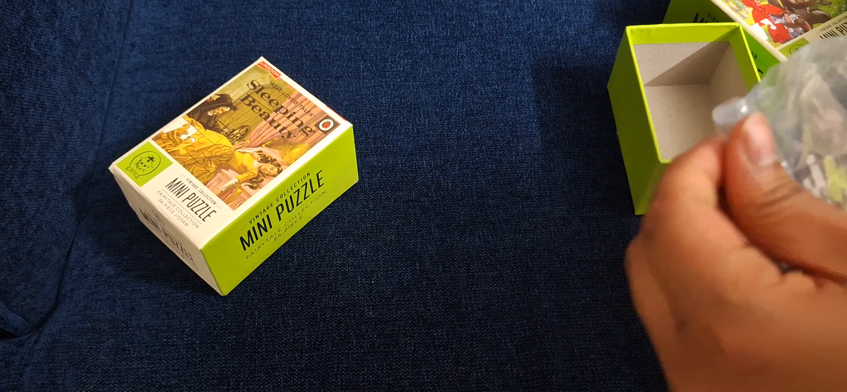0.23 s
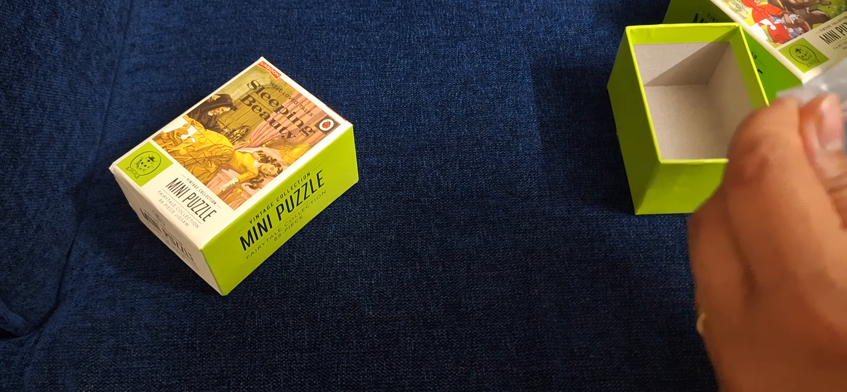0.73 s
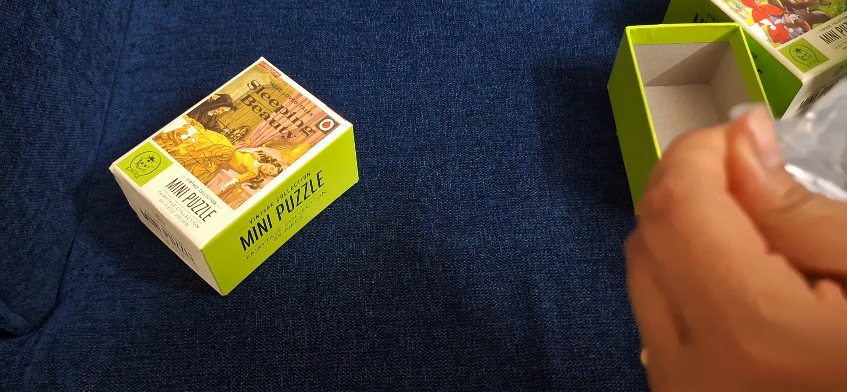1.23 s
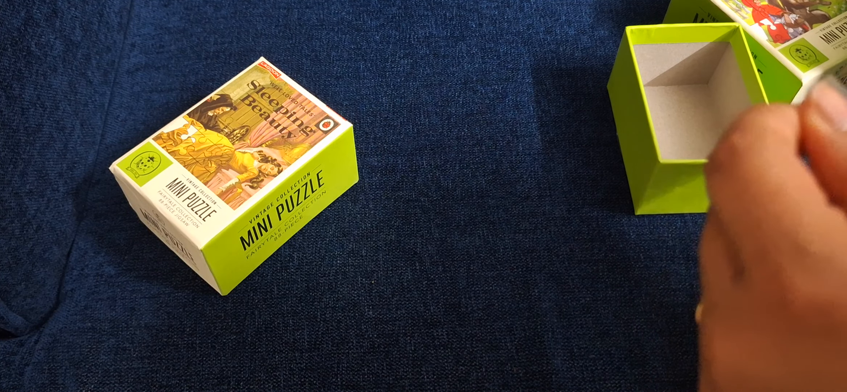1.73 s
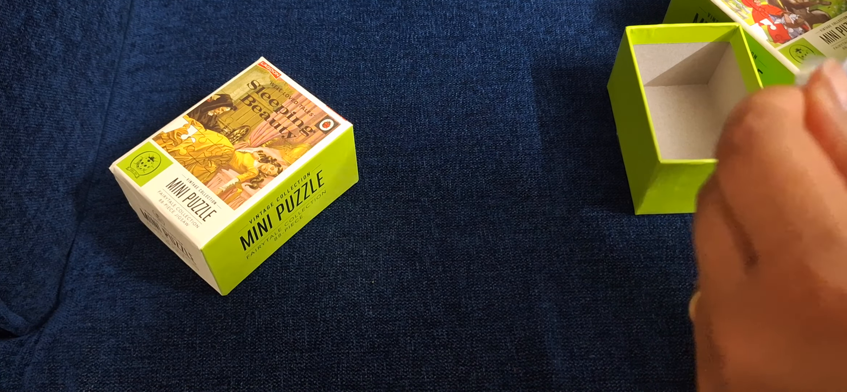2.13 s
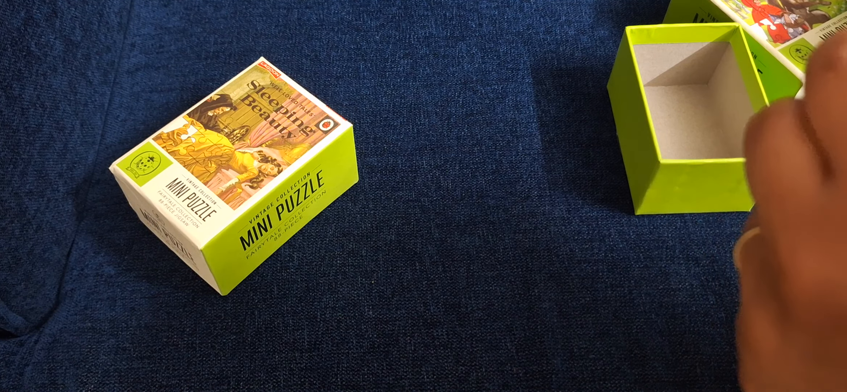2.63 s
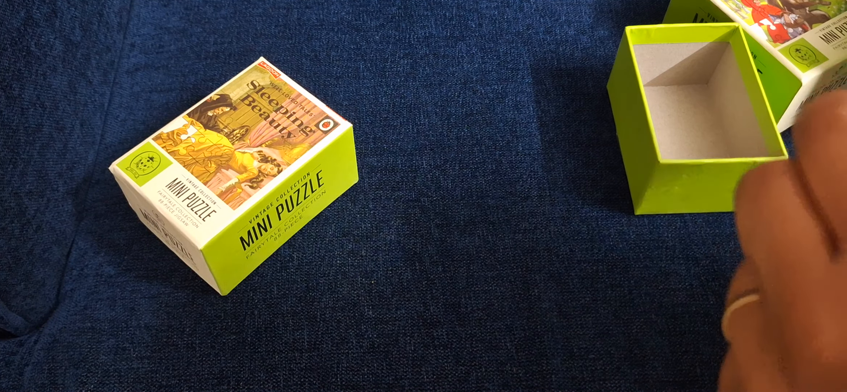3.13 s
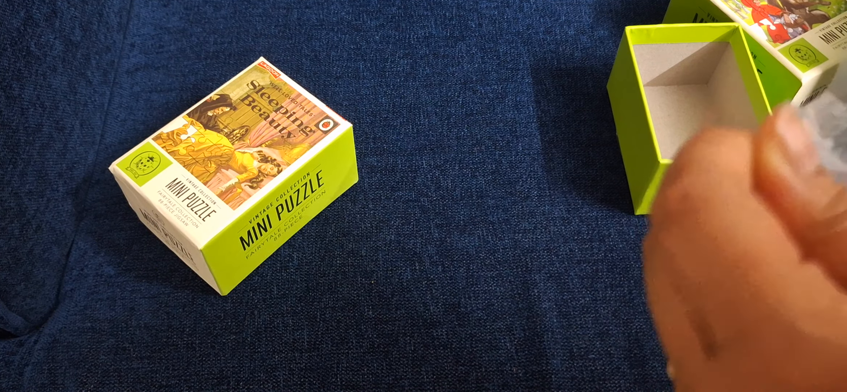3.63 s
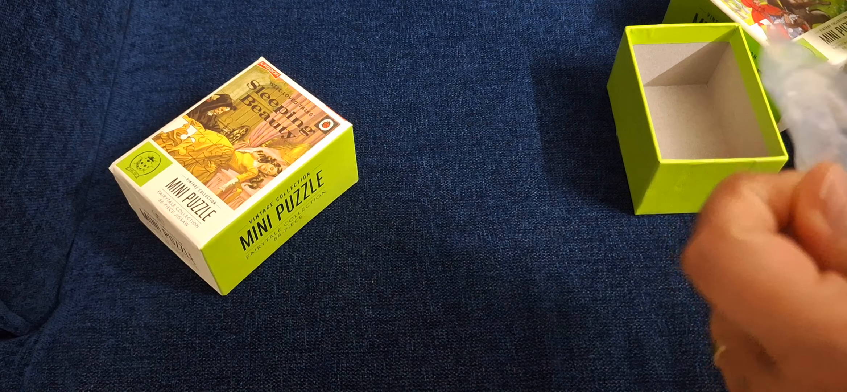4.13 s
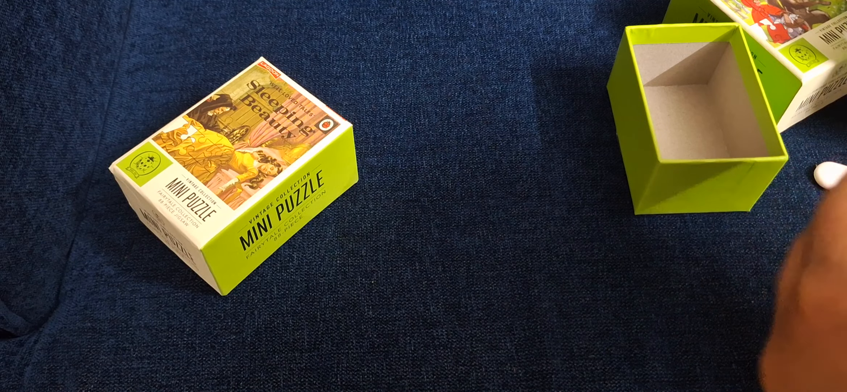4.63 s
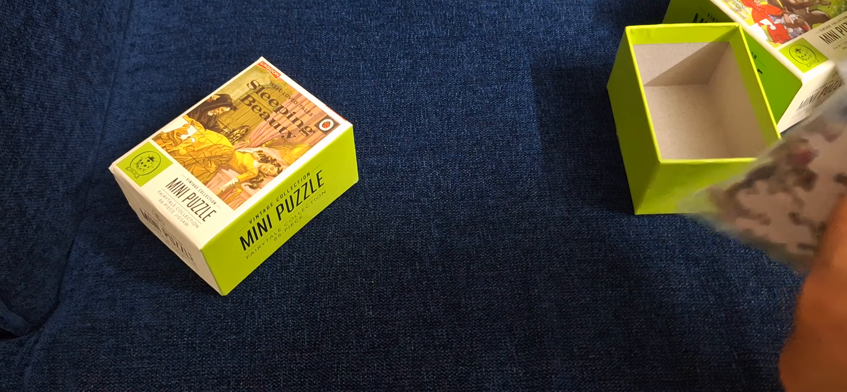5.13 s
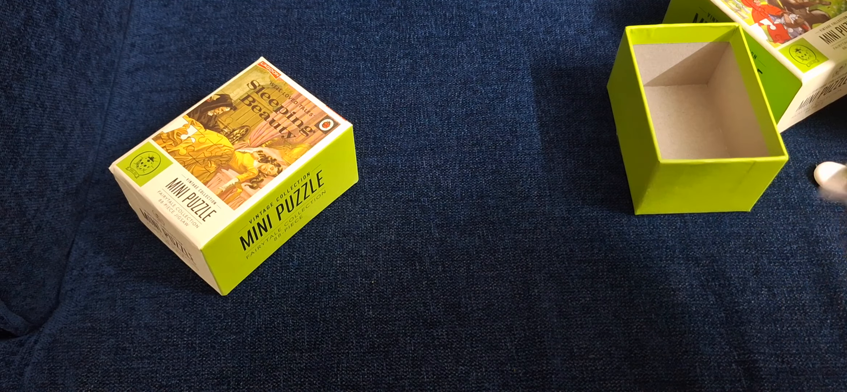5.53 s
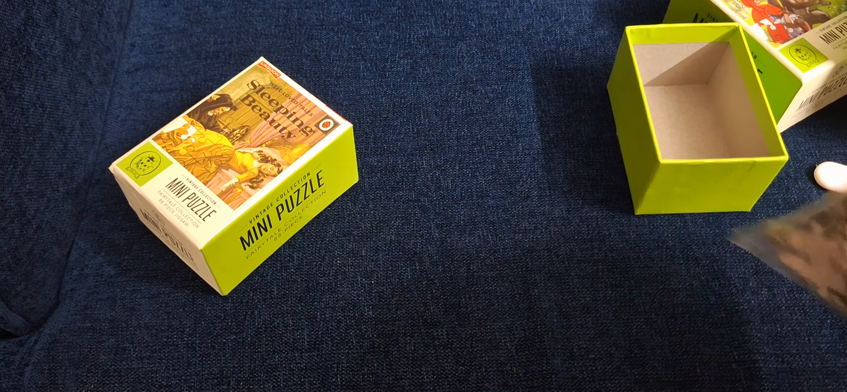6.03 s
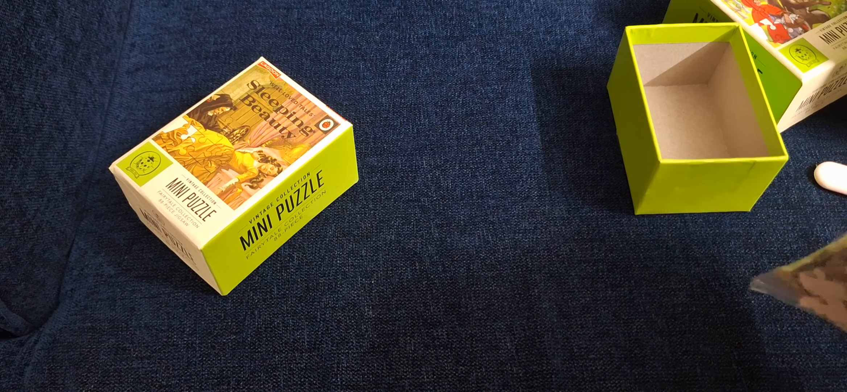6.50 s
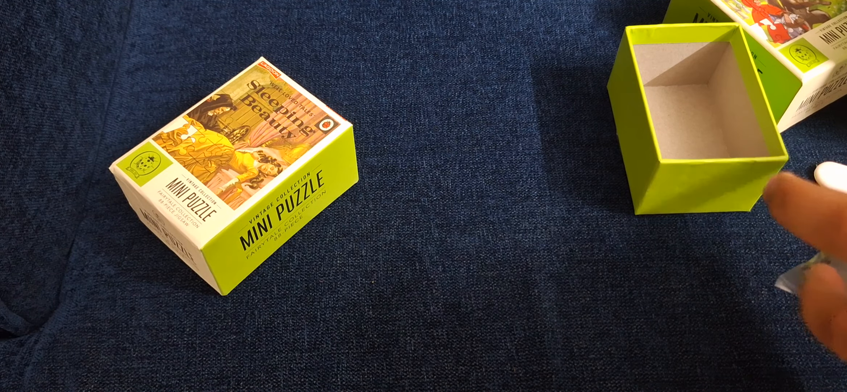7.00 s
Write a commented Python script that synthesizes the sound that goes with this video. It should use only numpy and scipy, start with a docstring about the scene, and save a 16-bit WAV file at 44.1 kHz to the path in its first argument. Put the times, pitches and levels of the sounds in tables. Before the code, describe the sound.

Close to the microphone and mostly on the right, hands work open a small plastic bag of cardboard puzzle pieces. A few light crackles build into sharp crinkling, and the seal peels with a brief rasp. Irregular squeezes and tugs follow, with crisp snaps, rubbing plastic, soft bumps and pieces shuffling and clicking inside. A faint low hum lies under it all in a quiet furnished room.

```python
"""Opening a bag of puzzle pieces

Hands pull open a small plastic bag of cardboard pieces, close to the right of a phone in a furnished
room. Each squeeze crinkles the film and shuffles the pieces, and large creases buckle with sharp snaps.
Friction makes fingertips hiss and pressed film rasp and creak; the seal peels in one burst of slips.
The bag bumps softly, and a mains hum lies under it all."""
import sys
import numpy as np
from scipy import signal
from scipy.fft import rfft, irfft
from scipy.io import wavfile
from scipy.ndimage import map_coordinates

SR = 44100
rng = np.random.default_rng(int(sys.argv[2]) if len(sys.argv) > 2 else 0)


def put_to_file(sound):
    """Save the sound as 16-bit audio at rate SR, in the file named by the first command-line argument."""
    columns = np.atleast_2d(sound).T  # one column per channel
    safe = np.clip(columns, -1, 1)
    whole_steps = np.round(safe * 32767)
    wavfile.write(sys.argv[1], SR, whole_steps.astype(np.int16))


N = 320166
TIME = np.arange(N) / SR

# Spectra of the steady background: f/Hz, level/dB
APPLIANCE_SPECTRUM = [(20, -45.5), (40, -23), (55, -6), (65, 7), (80, -4), (110, -6), (150, -16.5),
                      (300, -55)]
AIR_SPECTRUM = [(100, -21.5), (200, -17.5), (400, -20.5), (900, -32), (3600, -46.5), (7600, -43),
                (16000, -50)]
# Squeezes and tugs: t/s, hold/s, relative film level/dB, level of the pieces/dB
SQUEEZES = [(0.038, 0.15, -64, -58.5), (0.26, 0.23, -66.5, -69), (0.679, 0.09, -47, -61),
            (0.991, 0.23, -37, -52.5), (1.33, 0.22, -44.5, -57.5), (1.778, 0.0072, -47, -49),
            (1.851, 0.049, -48.5, -48), (2.047, 0.0082, -66, -50.5), (2.15, 0.0084, -52.5, -57),
            (2.431, 0.012, -55, -54.5), (2.56, 0.028, -42, -51.5), (2.828, 0.048, -48.5, -58),
            (2.998, 0.034, -47.5, -62), (3.138, 0.013, -35, -51.5), (3.239, 0.093, -35, -51.5),
            (4.124, 0.067, -44, -50), (4.27, 0.16, -57.5, -66), (4.433, 0.045, -42, -47),
            (4.56, 0.017, -42.5, -51.5), (4.68, .19, -43.5, -57), (5.048, 0.24, -48, -55.5),
            (5.432, 0.075, -51, -45), (5.619, 0.41, -47, -57.5), (5.949, 0.25, -62.5, -57),
            (6.26, 0.013, -39.5, -54.5), (6.363, 0.031, -33, -54), (6.48, 0.097, -56, -69),
            (6.619, 0.26, -48.5, -61), (7.165, 0.026, -42.5, -57)]
# Spectra of crinkling film, shuffling pieces and a buckling crease: f/Hz, level/dB
CRINKLE_SPECTRUM = [(300, -24.5), (900, 1), (2000, 12.5), (2900, 8.5), (5000, 3), (7500, -0.5),
                    (9000, -7.5), (16000, -9)]
SHUFFLE_SPECTRUM = [(70, -15.5), (180, 3.5), (420, 1), (700, -6.5), (1400, -3), (2400, -16.5), (5000, -21)]
SNAP_SPECTRUM = [(100, -25), (240, -11), (420, -0.5), (1000, -3.5), (2100, 2.5), (2900, -1), (5200, -2.5),
                 (6400, -3), (7600, 3), (9000, -6), (16000, -3)]
# Large creases buckling: t/s, relative energy/dB, facet resonance f/Hz, body of bag and pieces/dB
SNAPS = [(0.0323, -29.5, 8050, -5), (0.058, -33.5, 6300, -4), (0.166, -28.5, 5250, -30),
         (0.2151, -22, 8450, -69), (0.4293, -24.5, 4820, -9), (0.677, -25, 6230, -2),
         (0.6919, -10, 2750, -7), (0.6991, -10.5, 6500, 10.5), (0.7122, -17.5, 4700, 12),
         (0.752, -5.5, 5030, 0), (0.814, -10, 6300, -24), (0.869, -11, 6800, 5), (0.958, -12.5, 4830, 1),
         (0.987, -11.5, 4970, 13.5), (0.9937, -10, 3180, -6), (1.0222, -9.5, 5000, 10),
         (1.031, -12, 4730, -3), (1.0475, -9, 4900, 14), (1.0649, -4, 5530, -1), (1.0918, -5.5, 3180, -7),
         (1.097, -8.5, 4550, 8), (1.1248, -12, 6130, -6), (1.159, -4.5, 5070, 10), (1.208, -18, 3370, -20),
         (1.3223, -18, 2240, 5), (1.3785, -18.5, 1910, 2), (1.5853, -21, 4890, 13),
         (1.7317, -32.5, 3480, 3.5), (1.7933, -20, 6000, -17), (1.8, -22.5, 5100, -1),
         (1.839, -11, 4450, 3), (1.845, -17.5, 4200, -5), (1.859, -11, 4800, -2.5), (1.8776, -11, 7850, 11),
         (1.897, -0.5, 5230, -54), (2.141, -28, 4860, -21), (2.328, -35, 1970, 6), (2.439, -22, 3300, 3),
         (2.4769, -23.5, 4750, -5), (2.55, -19.5, 4480, -3), (2.557, -18, 4200, 5),
         (2.5732, -15, 1480, 0.5), (2.5856, -2.5, 10200, 4.5), (2.5964, -8.5, 3350, -31),
         (2.6606, -14.5, 2360, -8), (2.8053, -20.5, 4600, -10), (2.8376, -15.5, 2830, -9),
         (2.8425, -20, 2290, -1), (3.012, -24.5, 3020, 14), (3.023, -29, 2110, 16), (3.0817, -19, 4250, -2),
         (3.113, -24.5, 2900, -10), (3.1314, -6, 3480, 0), (3.1412, -1.5, 6100, -3),
         (3.1486, -5.5, 2570, -8), (3.185, -2, 5900, 3.5), (3.197, -5.5, 1880, -3),
         (3.2373, -0.5, 1960, 6.5), (3.2425, -13, 3200, 13), (3.2601, -5, 2435, 10.5),
         (3.2643, -7.5, 1297, 11.5), (3.2944, -1.5, 2140, 14.5), (3.37, -21.5, 2000, 14),
         (3.603, -34, 785, 4.5), (4.044, -30.5, 4300, 3.5), (4.1274, -17.5, 840, 17),
         (4.1494, -13, 3700, -25), (4.2243, -18.5, 6700, -27), (4.411, -21.5, 4100, -11),
         (4.419, -16.5, 7360, -17), (4.4448, -20.5, 1890, -6), (4.4545, -10, 4100, -16),
         (4.457, -11.5, 6500, -17), (4.475, -18, 2000, -10), (4.494, -18, 4870, 12.5),
         (4.5254, -16.5, 4300, -25), (4.561, -13.5, 3020, -0.5), (4.5946, -10.5, 3220, -12),
         (4.598, -14, 6860, -12), (4.6326, -13.5, 7800, 11.5), (4.661, -18.5, 4630, 0),
         (4.6887, -13, 2960, -3), (4.7085, -22, 3800, 4),(4.7345, -23.5, 6800, -17), (4.8026, -18, 6100, 6),
         (4.8201, -9.5, 2100, -11), (4.963, -24.5, 1410, 5), (4.9853, -13, 8900, -9),
         (5.0409, -14, 5130, 6), (5.0557, -12, 1980, 1), (5.0692, -7.5, 6900, -5), (5.1003, -3, 7350, -11),
         (5.12, -13.5, 5870, -30), (5.144, -15, 4100, -15), (5.153, -14.5, 5560, -19),
         (5.221, -20, 4520, -19), (5.2425, -29, 3500, 1), (5.2566, -18, 5270, -15),
         (5.2608, -10, 5400, -30), (5.3033, -16.5, 3040, -14), (5.337, -24, 4100, 3),
         (5.395, -17.5, 6840, -12), (5.4125, -16, 4560, -19), (5.423, -8.5, 2020, -14),
         (5.4317, -7, 8600, -3), (5.4455, -7.5, 5300, -3), (5.4661, -9, 7000, -10), (5.4737, -6.5, 5100, 6),
         (5.4778, -8, 4260, 12.5), (5.489, -12.5, 5000, -15), (5.5296, -11, 6160, -3),
         (5.5439, -15, 3500, 7), (5.588, -18, 7140, -23), (5.5932, -16.5, 2210, -3), (5.651, -10, 8450, -2),
         (5.676, -12, 7800, -8), (5.743, -22.5, 2540, -4), (5.7715, -17.5, 1560, -1.5),
         (5.8082, -17, 1910, 7), (5.8235, -16, 1900, 7), (5.9416, -15, 2460, 8), (5.9635, -20.5, 2600, 7),
         (6.0032, -20, 1620, 12), (6.023, -29, 3540, -11), (6.0525, -14, 1720, 1.5), (6.152, -13, 1910, -5),
         (6.2311, -14, 2200, -1.5), (6.367, -18, 1930, 1), (6.3762, -17.5, 1900, 4),
         (6.455, -19.5, 2300, -5), (6.5834, -21.5, 3350, -8), (6.6134, -11, 3100, -19),
         (6.66, -16.5, 1810, 11), (6.805, -23, 1720, 5.5), (6.832, -25, 1810, 3.5), (7.155, -12, 2580, -10)]
# Pieces colliding, low when flat, high when edge to edge: t/s, energy/dB, f/Hz
CLACKS = [(0.041, -26, 323), (0.669, -24.5, 1570), (0.828, -21.5, 363), (1.037, -11.5, 563),
          (1.11, -13, 920), (1.192, -14.5, 420), (1.216, -15.5, 1600), (1.245, -29, 480), (1.263, -16, 394),
          (1.399, -15, 1190), (1.856, -14.5, 513), (1.908, -17, 1470), (2.075, -32, 416),
          (2.428, -27.5, 317), (2.531, -30, 1200), (2.614, -14, 460), (2.676, -24.5, 446),
          (2.947, -32.5, 1470), (2.963, -38, 2200), (3.035, -30, 790), (3.3722, -11.5, 1440),
          (4.311, -29.5, 1480), (4.738, -24.5, 580), (5.741, -17, 1360), (5.824, -16, 396),
          (6.092, -24, 1200), (6.122, -25.5, 750), (6.171, -22.5, 990), (6.266, -27, 746),
          (6.313, -25, 1100), (6.33, -20.5, 1100), (6.344, -16.5, 850)]
# Fingertips sliding on smooth film: t/s, hold/s, level/dB
SLIDES = [(0.08, 0.0043, -54.5), (0.112, 0.091, -66), (2.041, 0.03, -55.5), (2.385, 0.017, -58.5)]
# Film dragged over film and pieces: t/s, hold/s, level/dB, left minus right/dB
DRAGS = [(1.03, 0.11, -49.5, 0), (1.768, 0.034, -55, -4), (3.197, 0.11, -36, -3), (4.438, .04, -43, -5),
         (5.049, 0.018, -40, -8), (5.43, 0.062, -39.5, -1.5), (5.95, 0.25, -57.5, 1),
         (6.376, 0.026, -46.5, 4)]
# Spectra of the slips in sliding, dragging and peeling: f/Hz, level/dB
SLIDE_SPECTRUM = [(1000, -14.5), (5000, 0), (7500, -2), (16000, -2)]
DRAG_SPECTRUM = [(230, -27), (500, -3), (1100, -3.5), (1900, 2), (3600, 0), (5200, -0.5), (7800, -5),
                 (9000, -10.5), (16000, -5)]
SEAL_SPECTRUM = [(70, 2), (200, 15), (450, 11.5), (900, -11.5), (2000, 2.5), (3000, 1.5), (5500, 2),
                 (6800, -5), (7600, 2.5), (9000, -6.5), (16000, -4.5)]
# Soft bumps of hand and bag: t/s, level/dB, f/Hz
BUMPS = [(1.47, -44, 174), (1.497, -39, 71), (2.047, -37.5, 207), (3.185, -36.5, 51.1), (3.241, -34, 72.7),
         (4.151, -39.5, 144), (4.169, -40, 72), (5.43, -43, 99), (5.824, -35, 213), (5.962, -45.5, 101),
         (6.602, -41.5, 79.2), (7.175, -37, 96.5)]
# Single slips of taut film: t/s, energy/dB
CREAKS = [(3.711, -17.5), (3.7385, -31), (3.78, -36), (3.807, -34), (3.8408, -37.5)]
# Resonances of taut film: f/Hz, half-width/octaves, peak/dB
TAUT_FILM_MODES = [(4000, 0.19, 17.5), (7650, 0.12, 19), (13000, 0.45, 8.5)]
# Direction of the bag: t/s, left minus right/dB
BAG_PAN = [(0, -6.5), (1.1, -5), (1.9, -10.5), (2.55, -8), (2.8, -3), (3.14, -5), (3.29, -13.5),
           (3.37, -0.5), (3.7, -11), (4.2, -4), (5.1, -7), (5.5, -2.5), (6.0, -2), (6.4, -3), (6.8, 5),
           (7.2, 4.5)]
# Response of the left microphone port, which faces away and loses treble: f/Hz, gain/dB
FAR_PORT_RESPONSE = [(70, 0.5), (250, 2), (1000, 2), (7200, 1.5), (8700, -3.5), (16000, -7)]

FORERUN_S = .0035  # longest lead of a crease's small first flip over its main one


def undb(db):
    """A level of 20 dB is a factor of ten in amplitude."""
    return 10 ** (np.asarray(db) / 20)


def unit(x):
    """Normalisation to an rms of 1."""
    return x / np.sqrt(np.mean(x ** 2))


def bins(size):
    """Frequencies of the discrete Fourier transform, held at 1 Hz or above."""
    return np.maximum(np.arange(size // 2 + 1) * SR / size, 1)


def shape_db(points, size):
    """Interpolation of a spectrum along logarithmic frequency."""
    hz, db = np.transpose(points)
    return np.interp(np.log(bins(size)), np.log(hz), db)


def causal(db):
    """Minimum-phase response for a gain curve: a sharp onset, with the ringing after it."""
    cepstrum = irfft(np.log(undb(db)))
    half = len(cepstrum) // 2
    cepstrum[1:half] *= 2
    cepstrum[half + 1:] = 0
    return np.exp(rfft(cepstrum))


def colour(x, spectrum, size=8192):
    """Convolution imposes a spectrum on both channels."""
    return signal.fftconvolve(x, irfft(causal(shape_db(spectrum, size)))[None], axes=1)[:, :N]


def resonance(centre_hz, octaves, size):
    """A resonance curve: 1 at its centre, one half at the given distance to either side."""
    return 1 / (1 + (np.log2(bins(size) / centre_hz) / octaves) ** 2)


def noise_pair(apart, size):
    """Partial coherence: two noises share a common part."""
    common, left, right = rng.standard_normal((3, size))
    return (common + apart * np.array([left, right])) / np.hypot(1, apart)


def wander(per_s):
    """Random modulation: Gaussian values joined by straight lines."""
    return np.interp(TIME * per_s, np.arange(4096), rng.standard_normal(4096))


def grains(per_s, spread_db, apart):
    """Shot noise: impulses at random times, a few much larger than the rest."""
    strength = undb(spread_db * np.minimum(rng.exponential(size=N), 3))
    return unit((rng.random(N) < per_s / SR) * strength * noise_pair(apart, N))


def effort(s, hold_s, rise_db_per_s=887, fall_db_per_s=392.5):
    """Envelope of a hand movement: exponential growth to 1 at time s, a hold, exponential decay."""
    before, after = np.maximum(s - TIME, 0), np.maximum(TIME - s - hold_s, 0)
    return undb(-np.minimum(rise_db_per_s * before + fall_db_per_s * after, 120))


def background(hum_hz=100, hum_db=-61, rumble_db=-61, air_db=-68.5):
    """Superposition of a mains tone, the rumble of an appliance and faint room air."""
    phase = 2 * np.pi * hum_hz * TIME + 0.18 * wander(0.55)
    hum = np.sqrt(2) * np.sin(phase) * undb(0.27 * wander(3.2))
    rumble = unit(colour(noise_pair(.65, N), APPLIANCE_SPECTRUM))
    air = unit(colour(noise_pair(0.89, N), AIR_SPECTRUM))
    return undb(hum_db) * hum + undb(rumble_db) * rumble + undb(air_db) * air


def contacts(low_hz, high_hz, per_s, spread_db, flutter_s, ring_db, count=8, size=512):
    """Impulse excitation: tiny contacts of several sizes, each size with its own flutter and ring."""
    out, fade = 0, np.exp(-np.arange(size) / SR / flutter_s)
    for ring_hz in np.geomspace(low_hz, high_hz, count):
        flutter = rfft(noise_pair(0.96, size) * fade)
        grain = unit(irfft(flutter * causal(ring_db * resonance(ring_hz, 0.69, size))))
        out = out + signal.oaconvolve(grains(per_s, spread_db, 0.28), grain, axes=1)[:, :N]
    return out


def handling():
    """The drive on film and pieces follows the strongest squeeze of the moment."""
    film, pieces = undb(-88), undb(-79)  # the bag barely stirs at rest
    for s, hold_s, film_db, pieces_db in SQUEEZES:
        squeeze = effort(s, hold_s, rise_db_per_s=590.5, fall_db_per_s=269.5)
        film = np.maximum(film, undb(film_db) * squeeze)
        pieces = np.maximum(pieces, undb(pieces_db) * squeeze)
    return film, pieces


def rustle(film_trim_db=-10.5, grip_db=4):
    """Crackling noise: film crinkles and pieces rub, modulated as the fingers catch and slip."""
    grip = undb(grip_db * wander(60))
    crinkle = contacts(1300, 11000, per_s=170, spread_db=3.9, flutter_s=.0009, ring_db=13)
    shuffle = contacts(150, 2500, per_s=150, spread_db=4, flutter_s=.002, ring_db=5.5)
    film = unit(colour(crinkle, CRINKLE_SPECTRUM) * grip)
    pieces = unit(colour(shuffle, SHUFFLE_SPECTRUM) * grip)
    film_gain, pieces_gain = handling()
    return film * film_gain * undb(film_trim_db) + pieces * pieces_gain


def buckling(size, flutter_top_hz=10000):
    """Spectrum of a snap-through: a pulse, its reflection off the hand and a few ms of duller flutter."""
    t, hz = np.arange(size) / SR, bins(size)
    span_s = .002 * undb(1.5 * rng.standard_normal())
    fade = (np.exp(-(t / span_s) ** 2) + .09 * np.exp(-t / .007)) * (1 - np.exp(-t / .00015))
    pulse = np.zeros((2, size))
    pulse[:, int(SR * .0005)] = [.9, 1.6]  # strongest at the near port
    pulse[:, int(SR * rng.uniform(.001, .0016))] = [.4, .6]
    flutter = rfft(0.79 * fade * noise_pair(1, size)) / (1 + (hz / flutter_top_hz) ** 2)
    # the crease gives in two steps, a small flip ahead of the main one
    first_s = FORERUN_S * rng.uniform(0, .8)
    first_gain = undb(-19 + 6 * rng.standard_normal())
    steps = first_gain * np.exp(-2j * np.pi * hz * first_s) + np.exp(-2j * np.pi * hz * FORERUN_S)
    return (rfft(pulse) + flutter) * steps


def snap(db, ring_hz, body_db, taut_hz=3400, body_hz=1400, narrow_octaves=0.09, size=1024):
    """Buckling excites resonant facets of film, which ring more toward the phone than into the room."""
    hz, push = bins(size), buckling(size)
    # film lying on the pieces is damped and sounds their body instead
    broad_db = (4 - 0.11 * body_db) * resonance(ring_hz, 0.39, size)
    bass_db = body_db / (1 + (hz / body_hz) ** 3)
    tautness = 1 / (1 + (taut_hz / ring_hz) ** 4)  # large, low facets are slack and only crunch
    own_mode = resonance(ring_hz, narrow_octaves, size)
    neighbours = sum(resonance(ring_hz * 2 ** rng.uniform(-2, 1.4), narrow_octaves, size)
                     for _ in range(4))
    ring_db = broad_db + tautness * (7.5 * own_mode + 5.5 * neighbours)
    treble_db = 0.66 * (db + 19.5) / (1 + (9000 / hz) ** 4)  # harder flips are quicker, so brighter
    tone_db = shape_db(SNAP_SPECTRUM, size) + bass_db + treble_db
    beamed = irfft(push * causal(tone_db + ring_db))
    spread = irfft(push * causal(tone_db + ring_db / 4))
    return undb(db) * np.array([unit(beamed), unit(spread)]) / np.sqrt(size)


def creases(gain_db=2):
    """Directional radiation: the snaps sum separately toward the phone and into the room."""
    beamed, spread = np.zeros((2, 2, N))
    for s, db, ring_hz, body_db in SNAPS:
        towards, around = undb(gain_db) * snap(db, ring_hz, body_db)
        add(beamed, s - FORERUN_S, towards)
        add(spread, s - FORERUN_S, around)
    return beamed, spread


def add(out, s, sound):
    """Linear superposition of a sound beginning at time s."""
    start = int(np.clip(s * SR, 0, N - 1))
    out[:, start:start + sound.shape[-1]] += sound[..., :N - start]


def tap(tone_db, scrape, scrape_s, apart, size):
    """Source and filter: an impulse with a short noisy tail drives a response, at unit energy."""
    push = scrape * np.exp(-np.arange(size) / SR / scrape_s) * noise_pair(apart, size)
    push[:, 0] += 1
    return unit(irfft(rfft(push) * causal(tone_db))) / np.sqrt(size)


def clacks(ring_db=15, low_hz=220, top_hz=3500, size=1024):
    """Damped impact: piece strikes piece, and the card absorbs the ring within a few cycles."""
    out, hz = np.zeros((2, N)), bins(size)
    softness_db = -10 * np.log10((1 + (low_hz / hz) ** 4) * (1 + (hz / top_hz) ** 2))
    for s, db, pitch_hz in CLACKS:
        tone_db = softness_db + ring_db * resonance(pitch_hz, 0.85, size)
        add(out, s, undb(db) * tap(tone_db, scrape=0.2, scrape_s=0.0023, apart=0.33, size=size))
    return out


def slides(grip_db=3):
    """Light sliding friction: skin catches unevenly on film, and very fine slips make a bright hiss."""
    grip = undb(grip_db * wander(150))
    hiss = unit(colour(grains(per_s=5500, spread_db=1, apart=1), SLIDE_SPECTRUM) * grip)
    return hiss * sum(undb(db) * effort(s, hold_s) for s, hold_s, db in SLIDES)


def drags(grip_db=5):
    """Friction under load: the tiny slips of hard-pressed film merge into a dense rasp."""
    slips = unit(colour(grains(per_s=6000, spread_db=1, apart=1.5), DRAG_SPECTRUM))
    grip = undb(grip_db * wander(150))
    gain = sum(undb(db + np.array([[pan_db], [-pan_db]]) / 2) * effort(s, hold_s)
               for s, hold_s, db, pan_db in DRAGS)
    return slips * grip * gain


def seal(peel_s=1.421, hold_s=0.093, db=-42, reflection=0.42, round_trip_s=0.0015, opening_per_s=0.15):
    """Comb filtering: the peeling seal's slips echo between cupped hands; the comb sinks as they part."""
    slips = colour(grains(per_s=19000, spread_db=4, apart=0.83), SEAL_SPECTRUM)
    trip_s = round_trip_s * (1 + opening_per_s * (TIME - peel_s))
    rasp = np.array([sum(reflection ** k * map_coordinates(side, [(TIME - k * trip_s) * SR])
                         for k in range(3)) for side in slips])
    return unit(rasp) * undb(db) * effort(peel_s, hold_s, rise_db_per_s=179, fall_db_per_s=226.5)


def bumps(rise_cycles=0.4, far_db=-4, far_lag_rad=0.12, size=8192):
    """Padded contact gives a low, heavily damped oscillation, weaker and later at the far port."""
    out, t = np.zeros((2, N)), np.arange(size) / SR
    for s, db, hz in BUMPS:
        age, phase = hz * t / rise_cycles, 2 * np.pi * hz * t
        swing = np.array([undb(far_db) * np.sin(phase - far_lag_rad), np.sin(phase)])
        add(out, s, undb(db) * age * np.exp(1 - age) * swing)
    return out


def creak(low_hz=3000, size=1024):
    """Stick-slip: stretched film ticks, and its resonances shift a little with the tension."""
    out = np.zeros((2, N))
    highpass_db = -10 * np.log10(1 + (low_hz / bins(size)) ** 8)
    for s, db in CREAKS:
        detune = 1 + .025 * rng.standard_normal()
        tone_db = highpass_db + sum(peak_db * resonance(hz * detune, octaves, size)
                                    for hz, octaves, peak_db in TAUT_FILM_MODES)
        add(out, s, undb(db) * tap(tone_db, scrape=0.16, scrape_s=0.0024, apart=1, size=size))
    return out


def room(x, wet_db=-11, t60_s=0.2, top_t60_s=0.19, top_db=-2.5, split_hz=7000, size=16384):
    """Diffuse reverberation builds and decays exponentially; the treble dies slightly sooner."""
    t = np.arange(size) / SR
    noise = noise_pair(4.9, size)
    low = signal.sosfilt(signal.butter(2, split_hz, fs=SR, output="sos"), noise)
    high = signal.sosfilt(signal.butter(2, split_hz, "high", fs=SR, output="sos"), noise)
    tail = low * undb(-60 * t / t60_s) - high * undb(top_db - 60 * t / top_t60_s)
    build = 1 - np.exp(-(t / .005) ** 2)
    return undb(wet_db) * signal.fftconvolve(x, unit(tail * build) / np.sqrt(size), axes=1)[:, :N]


def scene(port_lag_s=.00019):
    """Time and level differences place the bag: sound reaches the right port first, the left shaded."""
    beamed, spread = creases()
    rubbing = rustle() + clacks() + seal() + creak() + slides()
    dragging = drags()
    pan_db = np.interp(TIME, *np.transpose(BAG_PAN))
    left, right = (beamed + rubbing) * undb(np.array([pan_db, -pan_db]) / 2) + dragging
    late_left = np.pad(left, (int(port_lag_s * SR), 0))[:N]
    ports = np.array([late_left, right]) + room(spread + rubbing + dragging) + bumps()
    shaded_left = colour(ports, FAR_PORT_RESPONSE)[0]
    return np.array([shaded_left, ports[1]]) + background()


def record(dry, top_hz=16000):
    """Band limiting: the phone cuts the highest treble with a steep low-pass filter."""
    return signal.sosfilt(signal.ellip(8, .2, 70, top_hz, fs=SR, output="sos"), dry)


dry = scene()
out = record(dry)
put_to_file(out)
```